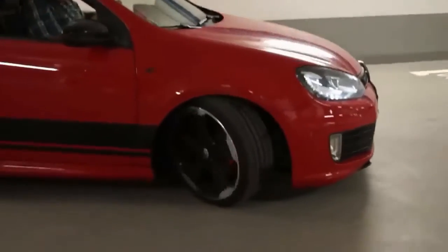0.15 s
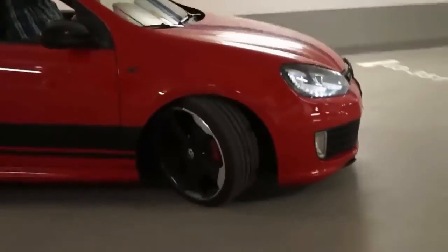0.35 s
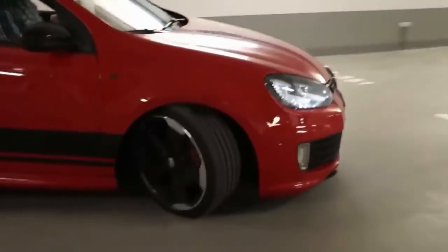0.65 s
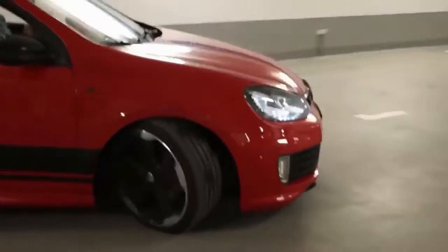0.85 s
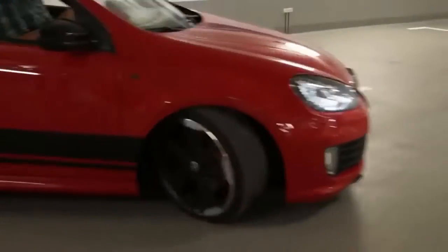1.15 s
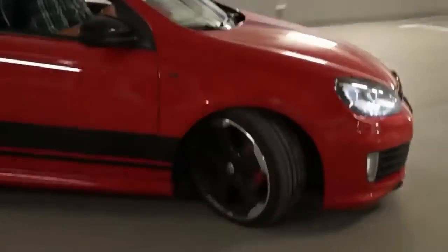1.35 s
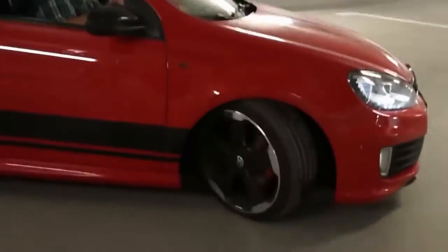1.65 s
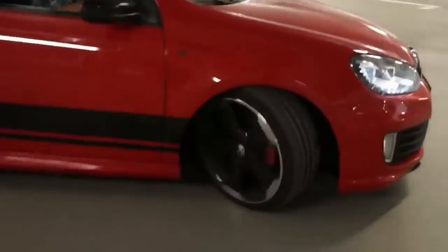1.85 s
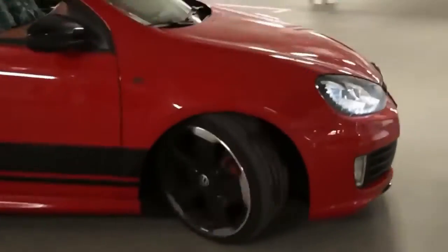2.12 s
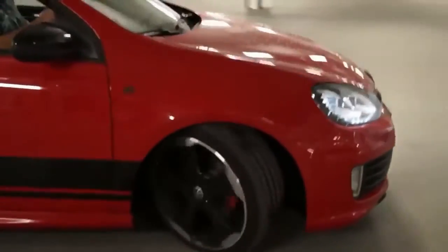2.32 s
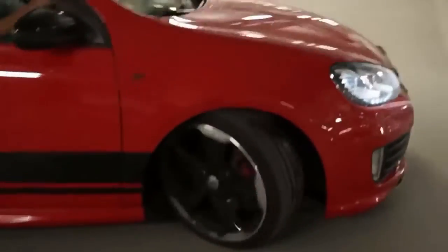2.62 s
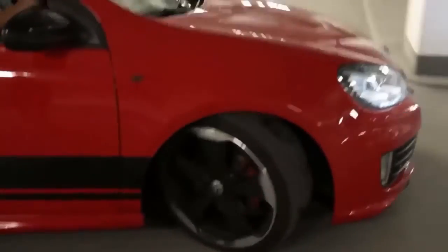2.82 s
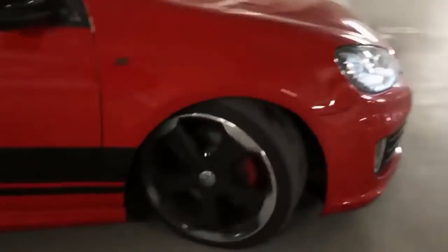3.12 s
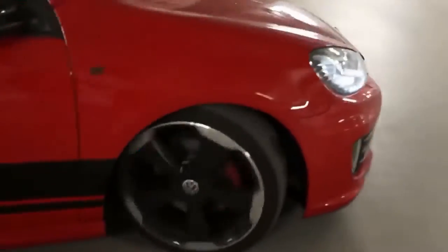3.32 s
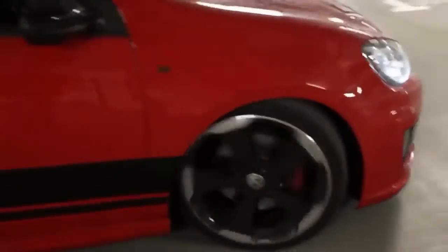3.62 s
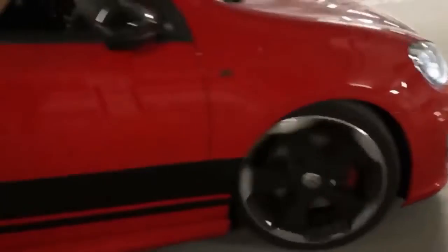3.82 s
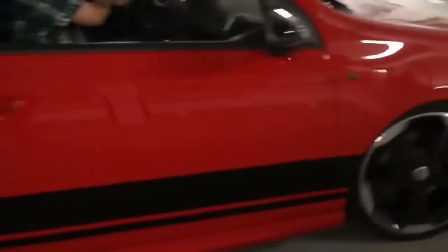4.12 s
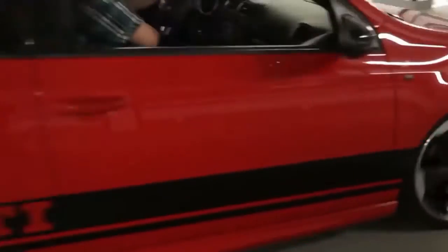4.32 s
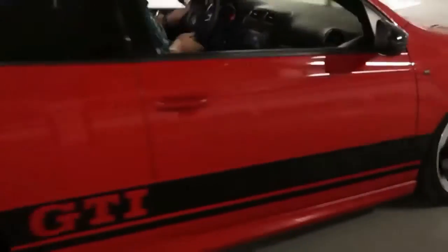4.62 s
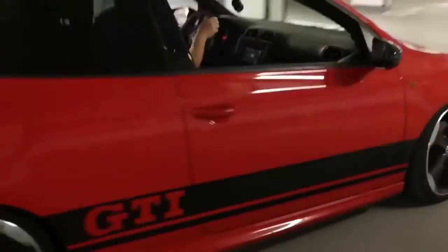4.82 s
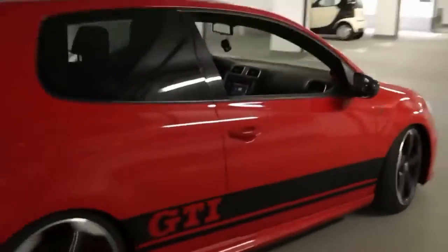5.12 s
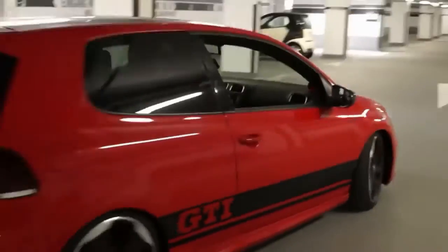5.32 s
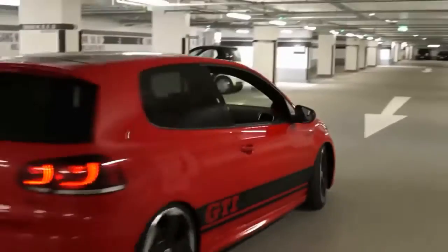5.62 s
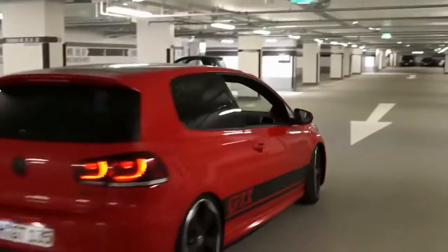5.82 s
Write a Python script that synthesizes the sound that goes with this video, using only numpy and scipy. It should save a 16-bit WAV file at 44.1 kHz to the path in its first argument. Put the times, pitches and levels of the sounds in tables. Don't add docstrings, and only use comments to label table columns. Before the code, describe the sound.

A four-cylinder car rolls slowly past close microphones in a concrete underground car park. Its deep exhaust drone sags around one second, picks up with a raspy blip, then idles along with airy intake hiss. A sharper rev comes near 3.7 seconds, falls back, and a harder, higher one follows after five seconds with crackling knocks and a rough gear whine.

```python
import sys
import numpy as np
from scipy import signal
from scipy.io import wavfile
from scipy.ndimage import uniform_filter1d

SR = 44100
rng = np.random.default_rng(int(sys.argv[2]) if len(sys.argv) > 2 else 0)


def generate_wav(signal):
    frames = np.transpose(np.atleast_2d(signal))
    scaled = np.clip(frames, -1, 1) * 32767
    pcm = np.round(scaled).astype(np.int16)
    wavfile.write(sys.argv[1], SR, pcm)


def volts_from_decibels(level):
    exponent = np.asarray(level, float) / 20
    return 10 ** exponent


N = 262836

# (frequency [Hz], width [Hz], level under the rasp [dB])
PANELS = [(649, 25, -15), (1018, 66, -12.5), (1342, 38, -15.5), (2056, 37, -15), (2530, 210, -14),
          (3192, 84, -13.5), (4490, 180, -25), (1763, 25, -20)]


def at_hz(points, hz):
    freqs, levels = np.transpose(points)
    return np.interp(np.log(hz), np.log(freqs), levels)


def in_time(rows):
    s, *columns = np.transpose(rows)
    return np.array([np.interp(np.arange(N) / SR, s, c) for c in columns])


def slope(curve, span_s):
    return uniform_filter1d(np.gradient(curve) * SR, size=int(span_s * SR))


def rms_one(x):
    return x / np.sqrt(np.mean(x ** 2) + 1e-20)


def drift(rate):
    r = np.exp(-80 * np.pi * rate / SR)
    white = rng.standard_normal(N // 40 + 2002)
    slow = signal.lfilter([1], [1, -2 * r, r * r], white)[2000:]
    return np.interp(np.arange(N) / 40, np.arange(len(slow)), rms_one(slow))


def bells(x, table):
    for hz, width, db in table:
        a, w, half = volts_from_decibels(db / 2), 2 * np.pi * hz / SR, np.pi * width / SR
        zeros = [1 + half * a, -2 * np.cos(w), 1 - half * a]
        poles = [1 + half / a, -2 * np.cos(w), 1 - half / a]
        x = signal.lfilter(zeros, poles, x)
    return x


def lean(hz):
    # (frequency [Hz], left minus right [dB])
    left_lean = [(60, 5.5), (110, 5.5), (200, 5), (380, 4.5), (700, 2), (1290, 1.5), (2380, 2.5), (4400, 0),
                 (8120, 0), (15000, -0.5)]
    return volts_from_decibels(at_hz(left_lean, hz) * np.array([[.5], [-.5]]))


def banded_noise(spectrum, patchy_db, count, moving_db):
    # (frequency [Hz], left-right correlation [-1 to 1])
    likeness = [(60, 0.48), (130, 1), (290, 0.028), (640, 0.59), (1410, 0.59), (3100, 0.48), (6820, 0.38),
                (15000, -0.48)]
    bands, power = 0, 0
    edges = np.geomspace(spectrum[0][0], spectrum[-1][0], count + 1)
    white = rng.standard_normal((2, 2, N))
    for k, (low, high) in enumerate(zip(edges, edges[1:])):
        sieve = signal.butter(2, [low, high], "band", fs=SR, output="sos")
        mid, side = signal.sosfilt(sieve, white[k % 2])
        hz = np.sqrt(low * high)
        alike = np.clip(at_hz(likeness, hz), -1, 1)
        gain = volts_from_decibels(at_hz(spectrum, hz) + patchy_db * drift(11.2)) * lean(hz)
        band = gain * (np.sqrt(1 + alike) * mid + np.sqrt(1 - alike) * side * [[1], [-1]])
        bands = bands + volts_from_decibels(moving_db(hz)) * band
        power = power + np.mean(band ** 2)
    return bands / np.sqrt(power)


def register_db(levels_db, hz):
    register_hz = [90, 150, 215, 290]
    place = np.interp(np.log(hz), np.log(register_hz), np.arange(len(levels_db)))
    return sum(np.clip(1 - np.abs(place - k), 0, 1) * level for k, level in enumerate(levels_db))


def swell_db(hz):
    # (time [s], frequency [Hz], gain [dB], half length [s])
    swells = [(0.037, 152, 8, 0.13), (1.55, 288, 11, 0.11), (1.83, 144, 7, 0.37), (2.6, 62, 3, .3),
              (3.31, 145, 5, 0.093), (3.32, 88, 8.5, .1), (3.66, 270, 8, 0.14), (3.9, 75, 5, 0.25),
              (4.1, 112, 17, 0.1), (4.45, 168, 4, 0.15), (4.8, 192, 7.5, 0.24), (3.3, 82, 3.5, 0.059),
              (5.25, 180, 6, 0.089), (5.523, 248, 6, 0.2), (5.56, 100, 9, .15), (5.8, 257, 10, 0.066),
              (4.25, 283, -5.5, 0.095), (3.5, 280, 8.5, 0.11), (4.45, 340, 9.5, 0.19), (5.43, 196, 5, .1),
              (5.52, 147, 4.5, .2), (5.55, 49, 4, .25), (5.1, 110, -7, 0.11), (3.1, 92, -10, .12),
              (0.19, 89, 2, .15), (5.58, 198, -6, 0.045), (5.08, 255, 9, 0.083), (3.77, 343, -4, 0.19)]
    width_octaves = .1
    t = np.arange(0, N + 64, 64) / SR
    octave = np.log2(np.interp(t, np.arange(N) / SR, hz))
    gain = 0
    for s, wave_hz, db, half_s in swells:
        off_pitch = (octave - np.log2(wave_hz)) / width_octaves
        gain = gain + db * np.exp(-((t - s) / half_s) ** 2 - off_pitch ** 2)
    return np.interp(np.arange(N) / SR, t, gain)


def orders(firing_hz, levels_db, low_db, half_db, waver_db, turns):
    # (frequency [Hz], gain [dB])
    pipe = [(13, -54), (22, -35), (43, -15), (85, -0.5), (118, -5.5), (145, -4), (216, -5), (280, -4.5),
            (349, -4.5), (395, -17), (420, -52), (550, -50), (920, -120)]
    cycles, out = np.cumsum(firing_hz) / SR, 0
    sparse_db = 10 * np.log10(firing_hz / 30)
    for k in np.arange(1, 14, .5):
        hz = k * firing_hz
        db = at_hz(pipe, hz) + register_db(levels_db, hz) + sparse_db
        db = db + (half_db if k % 1 else 0) + waver_db * drift(2.9)
        if k in (1, 2, 3):
            db = low_db[int(k) - 1]
        phase = 2 * np.pi * (k * cycles + rng.random() + turns * drift(1.74))
        apart = 0.19 * drift(0.94) + 0.19
        out = out + volts_from_decibels(db + swell_db(hz)) * lean(k * 33) * np.sin(phase + apart * np.array([[1], [-1]]))
    return out


def exhaust(firing_hz, octaves, rasp_db, exhaust_db, boom_db):
    # (offset [dB], gain with speed [dB per octave], share of the boom [ratio])
    registers = [(-2.5, 1, 0.059), (0.5, -3.5, -0.019), (-0.5, 3, 0.14), (-0.43, -3.8, 0.89)]
    # (frequency [Hz], level at mean load [dB])
    low_pipe = [(30, -58), (48, -44), (57, -46), (62.5, -41), (87, -31.5), (94, -41), (102, -31),
                (150, -32.5)]
    # (frequency [Hz], level [dB per Hz])
    flow = [(12, -53), (20, -16), (38, -19), (61, -22.5), (113, -0.5), (172, -3.5), (228, -3.5), (269, 1),
            (343, -9), (399, -27), (420, -25), (550, -52), (920, -120)]
    # (frequency [Hz], width [Hz], gain [dB])
    chambers = [(281.6, 18.6, 7.5), (140, 18, -0.5)]
    levels_db = [exhaust_db + db + per_octave * octaves + share * boom_db
                 for db, per_octave, share in registers]
    load_db = 1.11 * (rasp_db + 27)
    low_db = [at_hz(low_pipe, k * firing_hz) + load_db for k in range(1, 4)]
    unsteady = np.abs(slope(octaves, span_s=.25))
    clean = np.clip(.88 - .35 * unsteady + .6 * octaves, .5, .92)
    half_db = -10.5 - 12 * np.maximum(octaves, 0)
    tones = orders(firing_hz, levels_db, low_db, half_db, waver_db=2.5, turns=0.043)
    roar = banded_noise(flow, 0.68, count=11, moving_db=lambda hz: register_db(levels_db, hz))
    return bells(volts_from_decibels(1) * np.sqrt(clean) * tones + volts_from_decibels(7.0) * np.sqrt(1 - clean) * roar, chambers)


def firing_gate(firing_hz, depth):
    swell = np.cos(2 * np.pi * np.cumsum(firing_hz) / SR + 0.17 * drift(8))
    return rms_one(np.exp(depth * swell))


def panels(rasp_db, load_gain, flicker_db):
    out = 0
    for hz, width, db in PANELS:
        r, w = np.exp(-np.pi * width / SR), 2 * np.pi * hz / SR
        white = rng.standard_normal((2, N))
        mid, side = signal.lfilter([1, 0, -1], [1, -2 * r * np.cos(w), r * r], white)
        flicker = drift(3.9) + 0.9 * drift(12.6)
        burst_db = db + rasp_db + load_gain * (rasp_db + 22.0) + flicker_db * flicker
        out = out + volts_from_decibels(burst_db) * lean(hz) * rms_one(mid + .5 * side * [[1], [-1]])
    return out


def engine(firing_hz, rasp_db):
    # (frequency [Hz], level [dB per Hz])
    valve_gear = [(240, -56), (400, -5), (456, 8.5), (587, -4.5), (661, 4.5), (811, -2.5), (1020, 2),
                  (1530, -5), (2040, -3.5), (2500, -2.5), (3210, -7.5), (3850, -16.5), (4440, -19.5),
                  (6440, -37), (7000, -31), (9100, -72), (15400, -120)]
    bright_db = -5.5 + 0.053 * slope(rasp_db, span_s=0.27)
    tilt_db = 0.68 * (bright_db + 4.5)
    rasp = banded_noise(valve_gear, 0.81, count=11,
                        moving_db=lambda hz: rasp_db + 1.0 + tilt_db * np.log2(hz / 1300))
    buzz = panels(rasp_db, load_gain=0.71, flicker_db=3.5)
    return firing_gate(firing_hz, depth=np.clip(0.11 + 0.011 * (rasp_db + 23.5), 0, 1)) * (rasp + buzz)


def intake():
    # (frequency [Hz], level [dB per Hz])
    drawn_air = [(2060, -36), (3500, 8.5), (4350, -2), (4600, -16), (5410, -8), (6640, 1), (10300, -1),
                 (12500, -12.5), (15500, -8)]
    # (time [s], level [dB])
    facing = [
        (0, -47.5),
        (.6, -48),
        (1.0, -43.5),
        (1.4, -41.5),
        (2.75, -41),
        (3.45, -43.5),
        (3.7, -50),
        (4.9, -52),
        (5.2, -49.5),
    ]
    (hiss_db,) = in_time(facing)
    return banded_noise(drawn_air, 1.0, count=6, moving_db=lambda hz: hiss_db + 3.5)


def ventilation(rasp_db):
    # (frequency [Hz], level [dB per Hz])
    jets = [(11000, 0), (12500, -2.5), (14000, 2), (15200, 2)]
    return banded_noise(jets, .6, count=3, moving_db=lambda hz: -59.5 + .4 * (rasp_db + 30))


def hall(x):
    t60_s, cut_hz = 1.6, 1500
    out, dull = np.zeros((2, N)), np.exp(-2 * np.pi * cut_hz / SR)
    lags = (rng.uniform(.03, .07, 10) * SR).astype(int)
    for k, lag in enumerate(lags):
        loop, gain, state = x.copy(), volts_from_decibels(-60 * lag / SR / t60_s), [0.]
        for i in range(lag, N, lag):
            back, state = signal.lfilter([gain * (1 - dull)], [1, -dull], loop[i - lag:i], zi=state)
            loop[i:i + lag] += back[:N - i]
        out[k % 2] += (loop - x) * (-1) ** (k // 2)
    return out


def knocks(ring_s, under_db):
    # (time [s], peak level [dB])
    strikes = [(1.349, -13), (3.556, -16), (3.592, -8), (3.646, -10), (4.165, -23), (4.565, -22),
               (5.009, -18), (5.066, -11), (5.121, -19), (5.262, -8), (5.306, -4.5), (5.453, -19),
               (5.669, -6.5), (5.711, -4), (5.755, -12.5)]
    at, peak_db = np.transpose(strikes)
    spread, out = rng.standard_normal((len(at), len(PANELS))), 0
    for k, (hz, width, db) in enumerate(PANELS):
        clicks = np.full(N, 1e-18)
        mode_db = under_db + 1.35 * (db + 10.0) + 5.5 * spread[:, k]
        clicks[(at * SR).astype(int)] = volts_from_decibels(peak_db + mode_db)
        r, w = volts_from_decibels(-60 / (ring_s * SR)), 2 * np.pi * hz / SR
        out = out + signal.lfilter([0, np.sin(w)], [1, -2 * r * np.cos(w), r * r], clicks) * lean(hz)
    return out


def whine(firing_hz, rasp_db, teeth, under_db):
    phase = 2 * np.pi * teeth * np.cumsum(firing_hz) / SR
    rough = drift(45) * np.cos(phase) + drift(61) * np.sin(phase)
    return volts_from_decibels(rasp_db + under_db + 0.3 * (firing_hz - 46)) * rough * lean(2000)


def scene():
    # (time [s], firing rate [1/s])
    speed = [(0, 30.8), (.25, 29.5), (.5, 29.3), (1.03, 23.2), (1.23, 23.6), (1.39, 28.0), (1.62, 30.2),
             (1.95, 28.7), (2.17, 31.1), (3.0, 31.1), (3.38, 28.2), (3.77, 38.6), (3.92, 37.8),
             (4.14, 31.4), (5.01, 28.6), (5.37, 48.8), (5.63, 49.9), (5.96, 40.5)]
    # (time [s], rasp [dB], exhaust [dB], silencer boom at the microphones [dB])
    throttle = [(0, -29.5, -25, 1), (.2, -30.5, -30, 0.5), (.5, -31, -30.5, 3), (1.0, -33.5, -32.5, -7),
                (1.4, -28.5, -28, 0.5), (1.58, -24, -28, 4.5), (2.02, -27.5, -29, 2.5),
                (2.35, -24.5, -25.5, 6.5), (2.8, -27, -28.5, 5), (3.45, -29.5, -26, 0),
                (3.68, -22, -23.5, 3), (3.95, -23.2, -26, 3.5), (4.25, -27, -25, -5),
                (4.7, -30.5, -27, -4.5), (4.98, -31, -26.5, 0), (5.13, -22.5, -22, 0.5),
                (5.75, -21.5, -24, 4.5), (5.96, -24, -24.5, 3)]
    # (frequency [Hz], width [Hz], gain [dB])
    floor_dips = [(396, 49.4, -24.5), (584, 34, -6), (811, 45, -3.5), (3290, 720, -5.5), (3890, 340, -2)]
    (firing_hz,) = in_time(speed)
    rasp_db, exhaust_db, boom_db = in_time(throttle)
    firing_hz = uniform_filter1d(firing_hz, size=SR // 10)
    octaves = np.log2(firing_hz / 30)
    car = exhaust(firing_hz, octaves, rasp_db, exhaust_db, boom_db)
    car = car + engine(firing_hz, rasp_db) + intake()
    air = ventilation(rasp_db)
    car = car + knocks(ring_s=.045, under_db=-13)
    car = car + whine(firing_hz, rasp_db, teeth=45, under_db=-16.5)
    left, right = hall(car.mean(axis=0))
    tail = np.array([left + 0.69 * right, right + 0.82 * left]) * lean(200)
    return bells(car + volts_from_decibels(-19.0) * tail, floor_dips) + air


def drop_patches(x, per_db):
    # (low [Hz], high [Hz], readiness to drop of mid [spreads of chance], of side [spreads of chance])
    patchy_bands = [(6300, 7000, -1.0, -1.0), (7000, 7700, -.6, -.3), (7700, 8400, -.6, -.4),
                    (8400, 9100, -.6, -.5), (9100, 9800, -.4, -.6), (9800, 10600, .1, -.5),
                    (10600, 11200, .5, -.4), (11200, 11900, .9, 0), (11900, 13000, .3, .7),
                    (13000, 14000, .1, .5), (14000, 15100, .2, .4), (15100, 16000, 1.8, 1.8)]
    mid_side = np.array([[1.5], [-.5]])
    turn = np.array([[1, 1], [1, -1]]) / np.sqrt(2)
    hz, _, frames = signal.stft(turn @ x, SR, nperseg=2048)
    power = np.sum(np.abs(frames) ** 2, axis=0) + 1e-20
    middle = power[(hz > 500) & (hz < 4000)].sum(axis=0)
    chance = rng.standard_normal((len(patchy_bands), 2, power.shape[1]))
    chance = uniform_filter1d(chance, size=3) * np.sqrt(3)
    for (low, high, *readiness), luck in zip(patchy_bands, chance):
        band = (hz >= low) & (hz < high)
        under_db = 10 * np.log10(middle / power[band].sum(axis=0))
        threshold = np.c_[readiness] + per_db * mid_side * (under_db - np.mean(under_db))
        frames[:, band] *= (luck > threshold)[:, None]
    return turn @ signal.istft(frames, SR, nperseg=2048)[1][:, :N]


def low_pass(x):
    return signal.sosfilt(signal.butter(12, 15610, fs=SR, output="sos"), x)


def record(dry):
    limited = 1.296 * np.tanh(dry / 1.11)
    thinned = drop_patches(limited, per_db=.07)
    return low_pass(thinned)


dry = scene()
out = record(dry)
generate_wav(out)
```